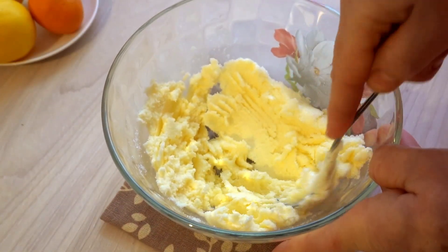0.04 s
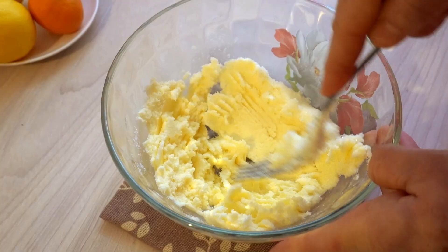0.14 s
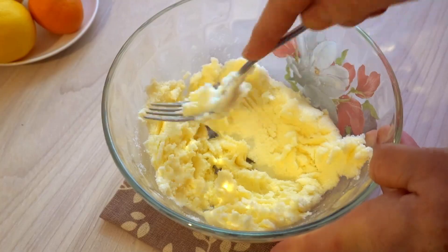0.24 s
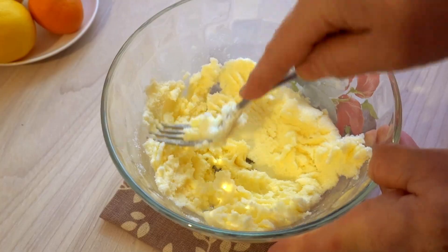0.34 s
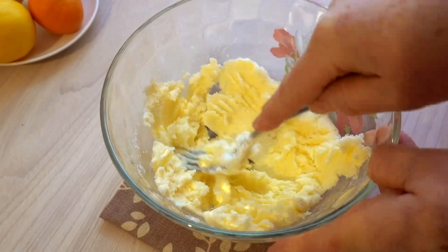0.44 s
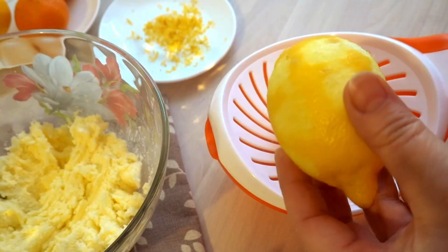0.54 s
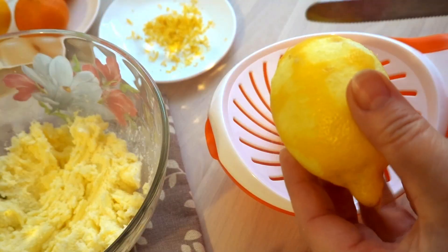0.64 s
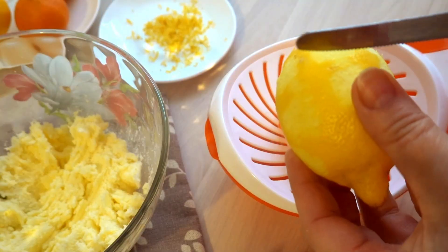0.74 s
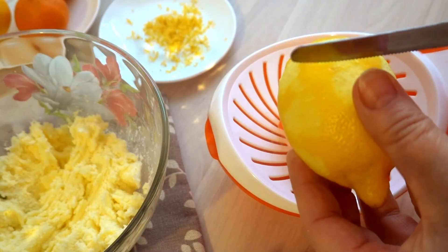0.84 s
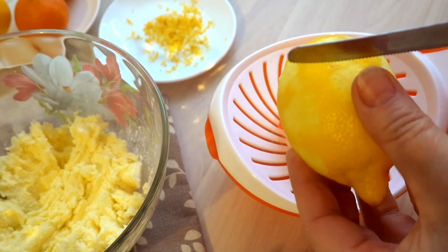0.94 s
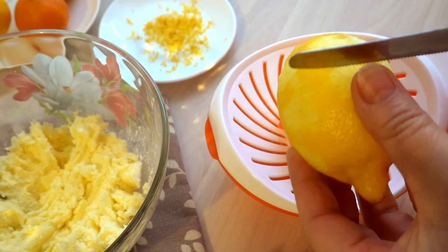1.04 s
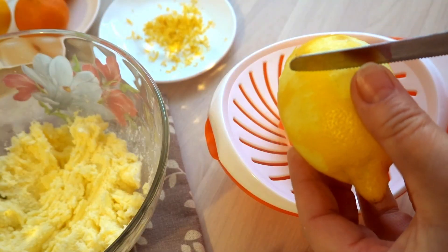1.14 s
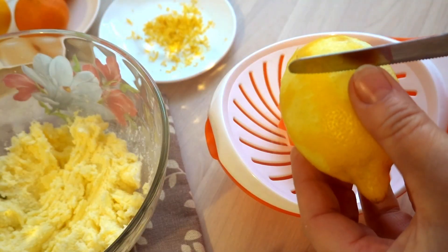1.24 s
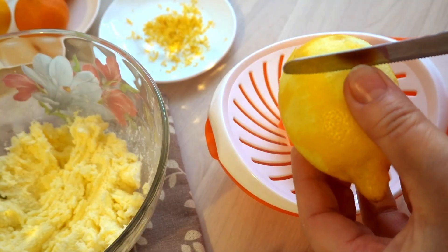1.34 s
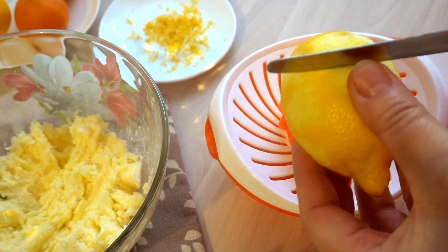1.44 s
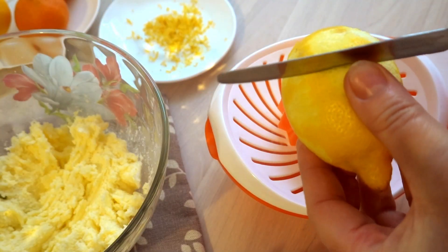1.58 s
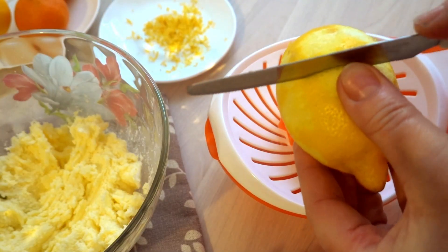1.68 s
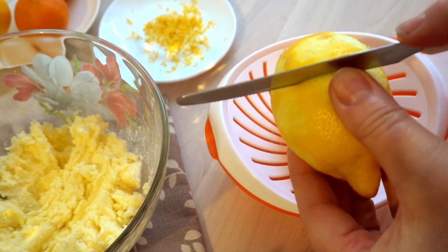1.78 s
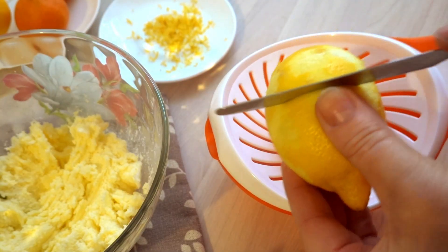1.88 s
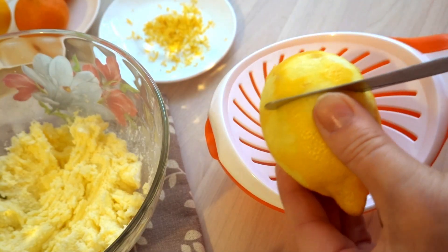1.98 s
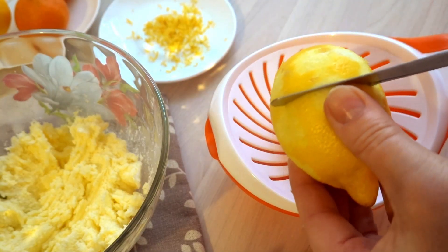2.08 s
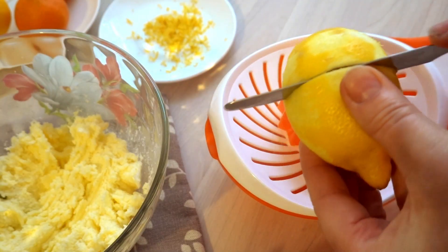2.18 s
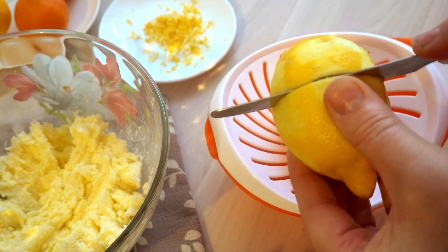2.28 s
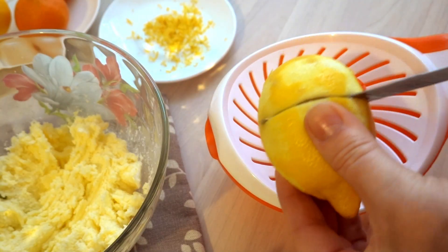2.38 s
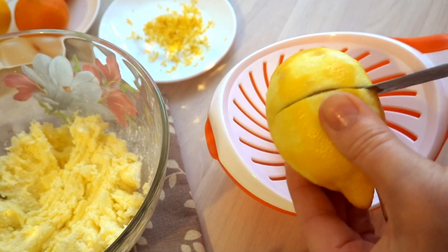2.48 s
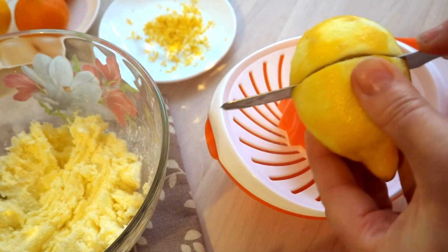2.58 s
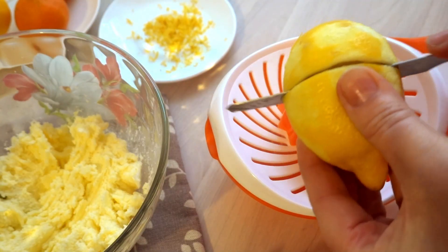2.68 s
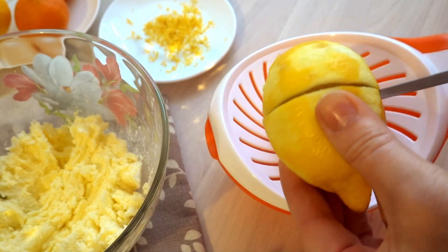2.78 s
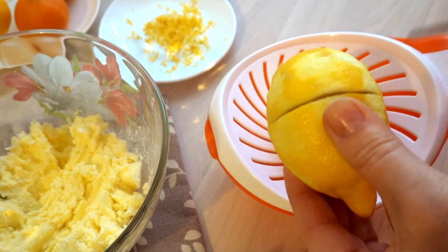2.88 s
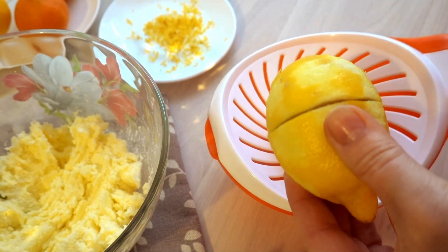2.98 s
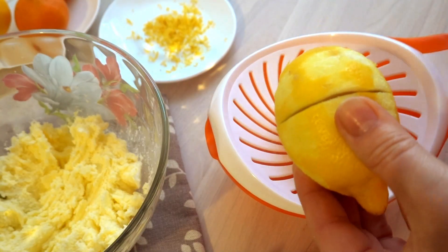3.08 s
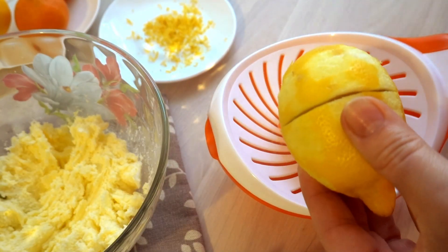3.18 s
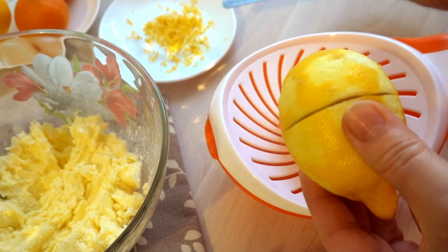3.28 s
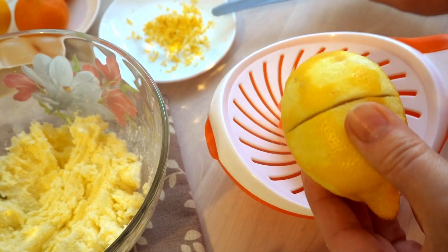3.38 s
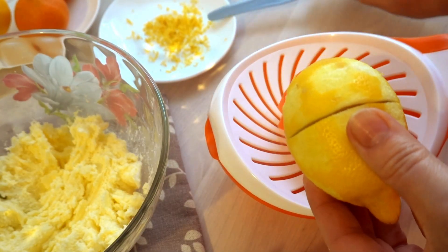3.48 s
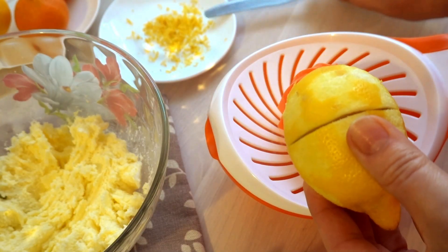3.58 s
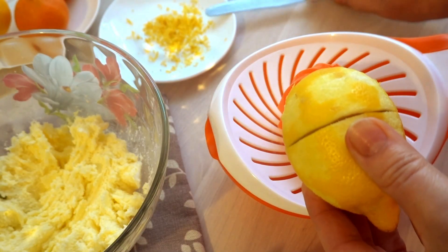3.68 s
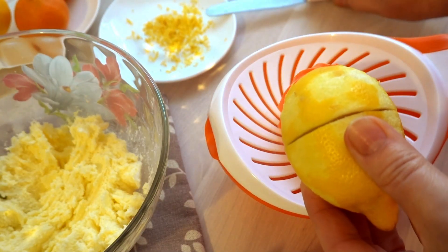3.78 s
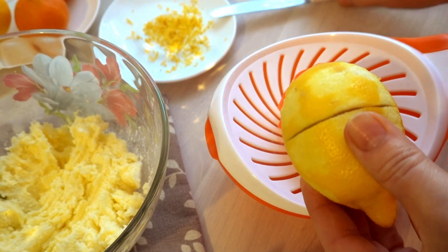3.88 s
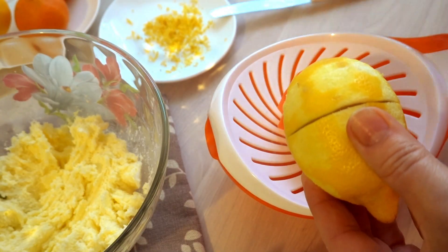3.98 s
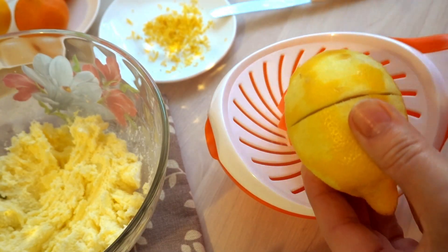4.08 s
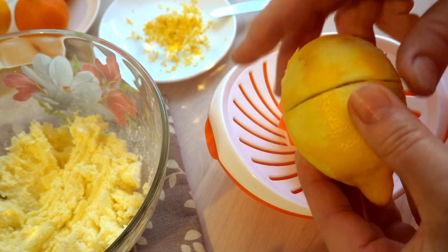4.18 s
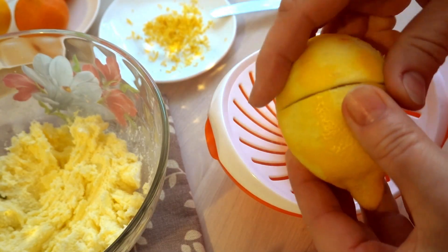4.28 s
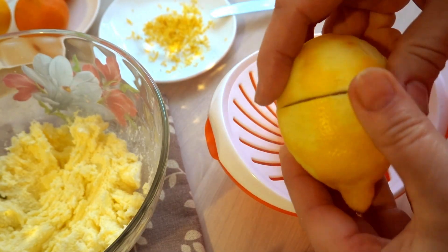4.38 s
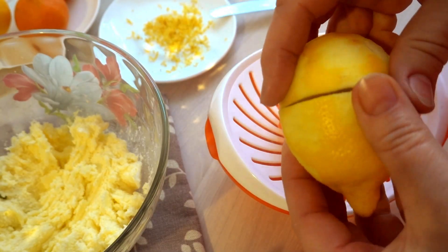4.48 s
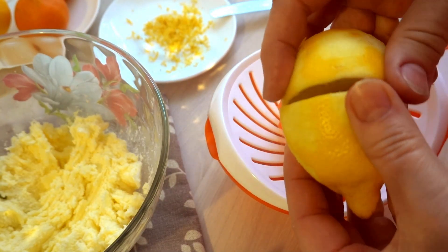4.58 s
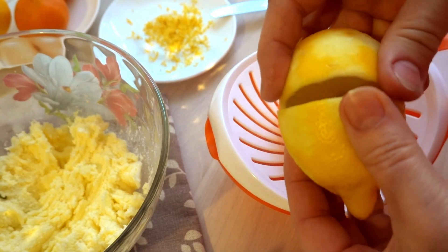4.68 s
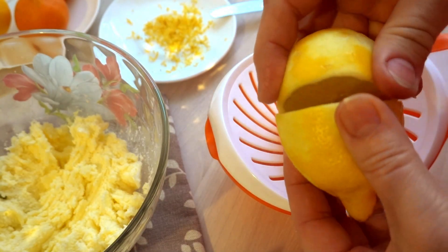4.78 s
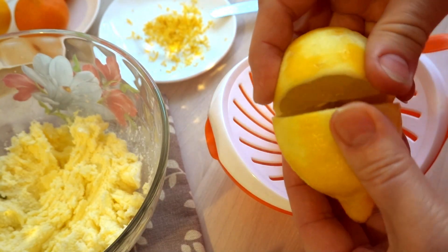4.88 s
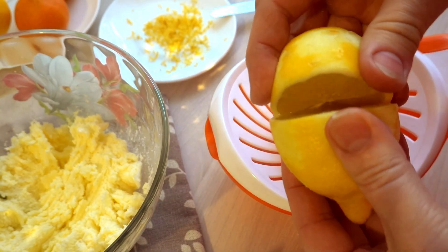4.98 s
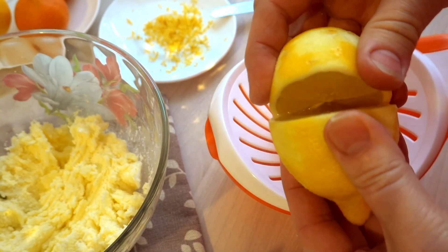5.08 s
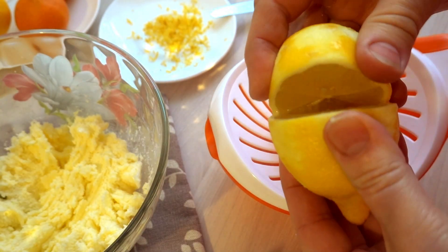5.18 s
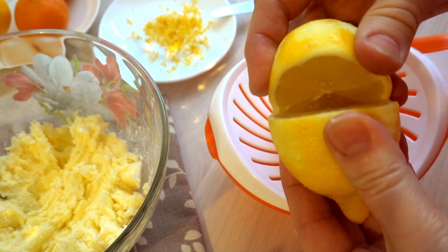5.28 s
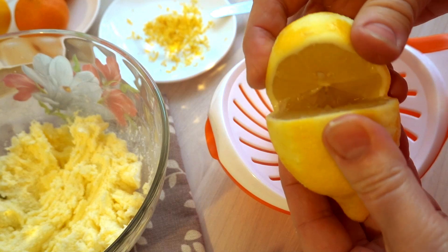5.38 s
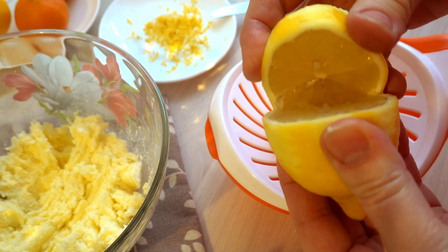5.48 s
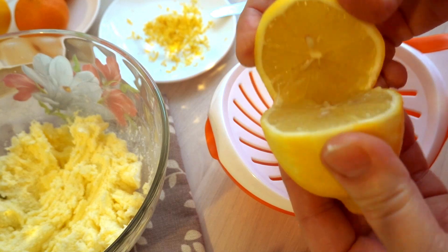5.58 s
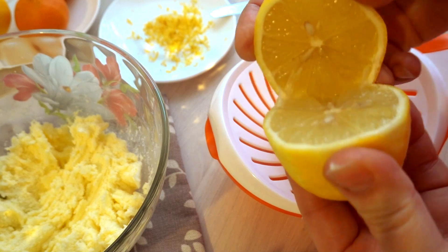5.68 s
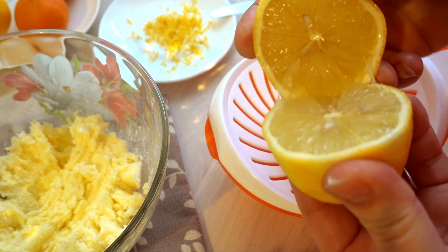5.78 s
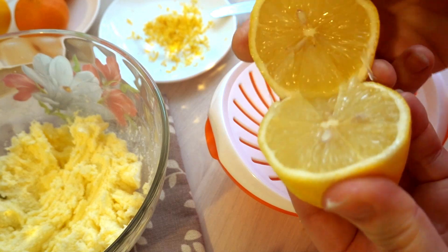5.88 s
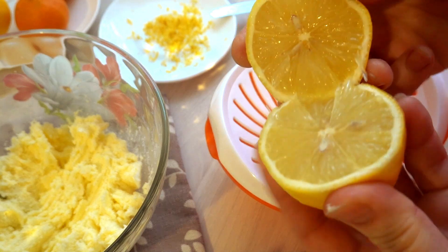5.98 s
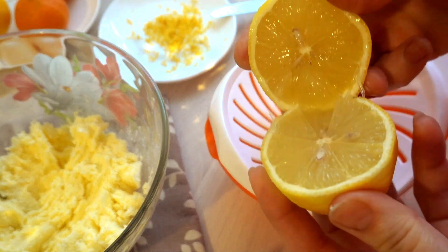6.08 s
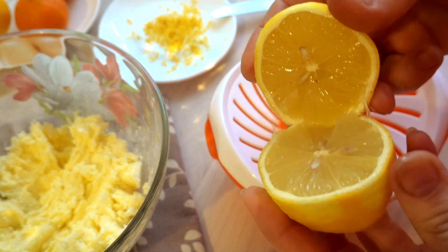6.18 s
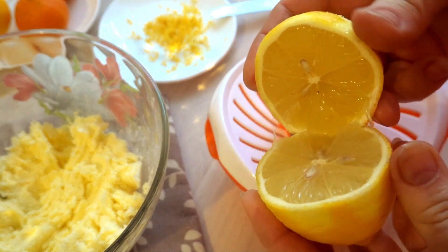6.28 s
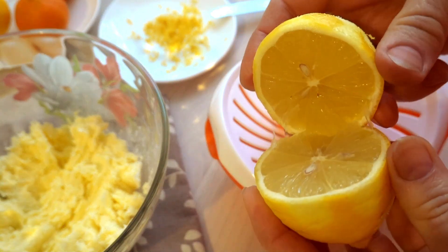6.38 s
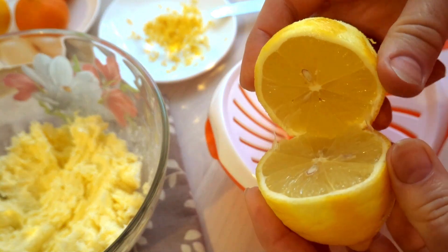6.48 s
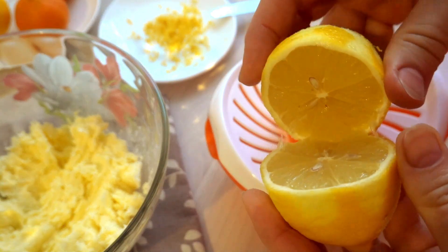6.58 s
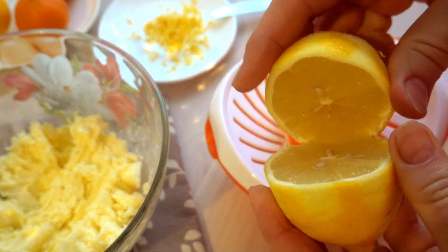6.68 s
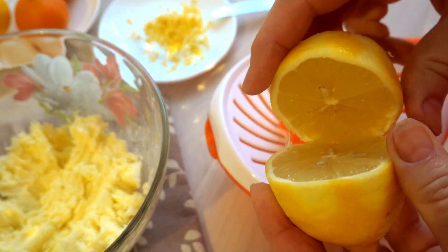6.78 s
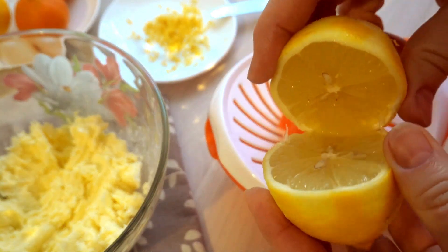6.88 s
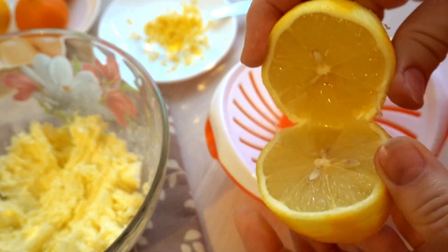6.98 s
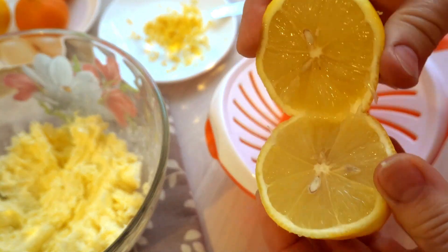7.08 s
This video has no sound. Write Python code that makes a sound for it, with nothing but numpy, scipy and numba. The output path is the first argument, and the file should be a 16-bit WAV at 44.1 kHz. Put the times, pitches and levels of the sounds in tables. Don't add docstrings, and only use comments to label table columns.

```python
import sys
import numpy as np
from scipy import signal
from scipy.fft import rfft, irfft
from scipy.io import wavfile
from scipy.ndimage import uniform_filter1d
from numba import njit

SR = 44100
rng = np.random.default_rng(int(sys.argv[2]) if len(sys.argv) > 2 else 0)


def waveform_to_disk(signal):
    frames = np.transpose(np.atleast_2d(signal))
    scaled = np.clip(frames, -1, 1) * 32767
    samples = np.round(scaled).astype(np.int16)
    wavfile.write(sys.argv[1], SR, samples)


def volts_from_decibels(level):
    exponent = np.asarray(level, float) / 20
    return 10 ** exponent


N = 314874
T = np.arange(N) / SR

# (frequency [Hz], level per Hz [dB])
KITCHEN_COLOUR = [(15, -39), (25, -17.5), (53, -6.5), (90, -3), (177, -3), (296, -5.5), (445, -5),
                  (617, -15.5), (878, 0.5), (979, -8), (1320, -7), (5270, -16), (11600, -16.5),
                  (15200, -13), (16500, -31)]
# (frequency [Hz], likeness [0-1])
KITCHEN_ALIKE = [(60, 0.2), (130, 0.9), (290, 0.6), (640, 0), (1410, 0.03), (3100, 0), (6820, 0),
                 (15000, 0)]
# (on [s], off [s], level [dB])
WHINE_TIMES = [(.58, 1.18, -72.5), (5.084, 6.32, -77), (6.515, 7.1, -75.5)]
# (time [s], level [dB])
RUMBLE_SHAKES = [(.4, -68), (1.57, -63), (1.95, -69.5), (2.19, -65), (2.5, -66), (2.9, -75), (3.2, -81),
                 (3.98, -66.5), (5.07, -68), (6.08, -70)]

# (frequency [Hz], width [Hz], level [dB])
FORK_STROKES = [
    (0.001, 0.048, -56.5, -57, 1),
    (.299, 0.021, -61.5, -60, 3),
    (.34, 0.14, -63.5, -52, 2),
]
FORK_CONTACT = [(0, 3700, -18), (.315, 3300, -28.5), (0.337, 2960, 8.5), (.405, 3480, -5.5),
                (.527, 3100, -20)]
BOWL_BODY = [(736, 76, 11), (316, 240, 0.5), (1560, 630, 1.5)]
# (time [s], rms level [dB], centre [Hz], width [Hz], swell [s])
RUB_PUFFS = [(0.65, -70.5, 2290, 260, .088), (.768, -51.5, 7900, 6400, .0041), (.78, -75, 2351, 460, .027),
             (.972, -66.5, 3250, 490, 0.02), (6.945, -69, 473, 110, 0.0058), (.445, -58, 2940, 410, 0.033),
             (1.366, -59, 4200, 4300, 0.012), (.506, -53, 3130, 440, 0.014), (2.294, -53, 3401, 1500, .004),
             (5.881, -53.5, 7501, 3000, 0.011), (2.32, -48.5, 335, 50, 0.02), (2, -60.5, 690, 120, .012),
             (2.5, -47.5, 381, 34, .0101), (2.7, -44.5, 693, 97, 0.021), (2.78, -54.5, 700, 140, 0.028),
             (2.9, -64, 251, 62, .084), (4.6, -66, 950, 120, 0.019), (4.64, -62.5, 908, 76, .02),
             (4.645, -65, 2600, 620, 0.015), (5.12, -66, 2055, 270, .031), (5.1, -65, 280, 200, 0.07),
             (5.9, -65, 901, 150, 0.029), (6.996, -58, 439, 72, 0.0053), (3.326, -51, 7621, 5200, .013),
             (5.462, -53, 2900, 2700, 0.012), (3.8, -55.5, 151, 90, 0.045), (3.832, -45.5, 373, 128, .012),
             (6.4, -71.5, 450, 150, 0.075), (1.6, -66.5, 253, 74, 0.037), (1.9, -57.5, 390, 230, 0.029),
             (0.0012, -66.5, 260, 110, 0.029)]
# (time [s], peak level [dB], frequency [Hz])
LOUD_SLIPS = [(.03, -44, 10000), (.3325, -38.5, 5900), (.4, -40, 3320), (.482, -42, 3360),
              (1.392, -43, 4210), (1.486, -34.5, 5160), (1.612, -24.5, 5200), (1.652, -34.5, 5040),
              (1.8305, -27.5, 3960), (1.89, -20, 3380), (1.932, -27.5, 3300), (1.938, -22, 3180),
              (2.14, -17, 3470), (2.187, -34, 4200), (2.298, -35, 3400), (2.309, -27, 3280),
              (1.3745, -46, 2900), (1.395, -31, 4620), (1.518, -33, 3240), (1.556, -29.5, 3670),
              (1.599, -35, 3600), (1.685, -36, 4050), (1.8325, -31.5, 4500), (1.908, -27, 3200),
              (1.966, -37, 4000), (2.076, -37, 6000), (2.13, -29.5, 3700), (2.329, -27, 3900),
              (2.467, -37, 4360), (2.513, -19.5, 3600), (2.527, -23, 3600), (2.543, -26, 3600),
              (2.548, -26, 4000), (2.72, -26, 4300), (2.76, -33.5, 4900), (.524, -42, 3100)]
# (time [s], level [dB])
SCENE_CHANGE = [
    (.536, 3.5),
    (.552, -9),
    (.56, -86),
    (.569, -14),
    (.586, -2),
]
HAND_STROKES = [(.585, 0.068, -73.5, -73, -8), (.74, 0.03, -111, -65.5, 5), (.93, 0.069, -81, -97, -5.5),
                (2.82, 0.089, -68, -69.5, 0), (2.95, 0.032, -83, -77.5, -6), (3.02, 0.19, -78.5, -65.5, -2),
                (3.328, 0.0068, -69, -63, 2)]
HAND_CONTACT = [(.58, 2300, 16.3), (.8, 2890, 7.8), (1.0, 3306, 1.8), (2.85, 3561, 16.4), (2.96, 2380, 9.2),
                (3.25, 2270, 11.7), (3.341, 2660, 7.3)]
PALM_BODY = [(250.1, 50, -4), (490.8, 484, 3), (1235, 850, 3)]
SAW_STROKES = [(1.389, 0.036, -48, -46, -2), (1.46, .14, -55, -42.5, -4), (1.65, 0.046, -55, -51.5, -7),
               (1.829, 0.072, -44.5, -34, -17), (2.04, .026, -51.5, -55.5, 3.5),
               (2.085, 0.037, -41.5, -33, -15.5), (2.303, 0.04, -42, -39.5, -18),
               (2.464, 0.057, -44.5, -32, -14.5), (2.668, 0.084, -46, -41, -10.5)]
SAW_CONTACT = [(1.38, 3670, -11), (1.75, 3430, -3.5), (1.88, 3175, -12.5), (2.1, 3590, -7),
               (2.35, 3650, -0.5), (2.55, 3400, -5), (2.7, 4040, 2.5), (2.8, 4700, 0)]
SAW_LIFT_TIMES = [1.455, 1.628, 1.718, 1.97, 2.08, 2.2, 2.4, 2.584, 2.806]
JUICER_BODY = [(337, 240, -4.5), (710, 380, -7), (1290, 3000, 16.5)]

# (time [s], ring level [dB], rattle level [dB], table thud level [dB])
TIP_BLOWS = [
    (3.4435, -5.5, -36.5, -24),
]
# (time [s], ring level [dB], rattle level [dB], table thud level [dB])
BLADE_BLOWS = [
    (3.7935, -6, -24, -31),
    (3.8105, -8, -27.5, -27.5),
    (3.842, -19.5, -25.5, -27.5),
    (3.862, -19.5, -30.5, -36),
]
STEEL_NOTES = [3078, 3700, 4015, 4400, 4720, 4880, 4985, 5260, 5550, 6190, 6956, 9300, 10450, 11300, 12030,
               12850, 13700, 15050]
# (bunch width [Hz], tip level [dB], blade level [dB], bounce level [dB])
STEEL_LEVELS = [(21, -21.5, -15, -0.5), (250, -19, -9, -13.5), (92, -13.5, 2.5, -1.5),
                (201, -21, -14.5, -16.5), (71, -10, -1, -5), (71, 2, 8, 8), (51, 2, 2.5, 0.5),
                (81, -14, -7, -9), (201, -13.5, -8.5, -12), (71, -22, -2, 5), (51, -4.5, 1.5, -2.5),
                (110.1, 0, 3, 1.5), (301, -17, -22.5, -22), (398, -20, -19, -19), (91, -18, -3, -3.5),
                (151, -18, -10, -10.5), (151, -21, -9.5, -9), (111, -11.5, -3.5, -3)]
# (after the tip [s], with the blade lying flat [s])
STEEL_DECAY = [(.3, 0.37), (.1, .15), (0.15, 0.3), (.1, .13), (.15, .15), (.1, .12), (.19, .17), (.22, .2),
               (0.17, .2), (.12, 0.38), (.08, .14), (0.059, .08), (.047, .047), (.08, .08), (.12, .12),
               (.1, .1), (.12, .12), (.14, .14)]
# (frequency [Hz], bunch width [Hz], fall by 60 dB [s], level [dB])
TIP_TABLE_MODES = [(250, 40, .1, -2), (305.5, 36, 0.12, 1), (376, 35, .07, -4), (525, 50, .12, 0.5),
                   (750, 80, 0.081, -6), (1000, 110, 0.047, -10), (1500, 450, .06, -12.5)]
# (frequency [Hz], bunch width [Hz], fall by 60 dB [s], level [dB])
BLADE_TABLE_MODES = [(253, 58, 0.3, -5.5), (295, 130, 0.05, -9.5), (365, 29, 0.26, 0), (574, 39, 0.15, -6),
                     (753, 73, 0.069, -9.5), (1390, 320, 0.11, -14)]
# (frequency [Hz], level per Hz [dB])
RATTLE_COLOUR = [(240, -27.5), (400, -7.5), (1200, -13), (3120, -12), (3370, -12.5), (4880, -4),
                 (8500, -17.5), (15300, -23), (16000, -50.5)]

PULP_STROKES = [(4.3, 0.015, -66, -68.5, -7), (4.638, 0.043, -58.5, -66, 0.5),
                (4.965, 0.22, -69.5, -79, -10.5), (5.25, 0.17, -65, -64, -4),
                (5.462, 0.14, -55.5, -65, 3.5), (5.59, 0.11, -68, -65, 2.5), (5.74, 0.088, -68, -61, 0.5),
                (5.878, 0.03, -55.5, -65, 4.5), (5.92, 0.027, -60, -66, -12), (6.03, 0.16, -78, -75.5, -10),
                (6.25, 0.28, -81, -77.5, -4.5), (7.005, .1, -68.5, -71.5, 2.5)]
PULP_CONTACT = [(4.1, 3200, 10.5), (4.3, 4060, 4), (4.64, 4730, 0.5), (5.0, 4173, 2.5), (5.12, 2080, 4),
                (5.3, 3270, -7), (5.87, 3430, -8), (6.1, 2913, 5), (6.759, 3414, 1)]
# (time [s], peak level [dB], frequency [Hz])
FIBRE_SNAPS = [(4.32, -45, 6000), (4.87, -51, 9000), (5.239, -47, 3900), (5.25, -29, 10000),
               (5.314, -44, 4000), (5.463, -39, 4000), (5.471, -36, 3000), (5.476, -25, 4000),
               (5.482, -27, 9000), (5.488, -33, 4000), (5.504, -19, 9000), (5.514, -39, 9000),
               (5.531, -30, 10000), (5.535, -30, 4500), (5.5406, -22, 7000), (5.556, -33, 3000),
               (5.569, -40, 3400), (5.606, -25, 3000), (5.608, -38, 4000), (5.6605, -39, 6000),
               (5.662, -36, 7000), (5.6635, -39, 5000), (5.675, -41, 4000), (5.682, -15.5, 11000),
               (5.691, -35, 11000), (5.733, -24, 8000), (5.785, -32, 6000), (5.825, -43, 4000),
               (5.852, -36, 12000), (5.853, -28, 12000), (5.8545, -36, 9000), (5.875, -44, 6000),
               (5.926, -43, 4000), (5.93, -44, 5000), (6.28, -50, 4500), (7.003, -32, 10000),
               (7.0995, -38, 4200), (7.123, -46, 6000)]
# (frequency [Hz], fall by 60 dB [s])
ROOM_DECAY = [(150, 0.74), (600, 0.56), (2500, 0.4), (7000, 0.26), (13000, 0.18)]

HANDS_LAG = 0.8
FORK_PAN_DB, HANDS_PAN_DB, SAUCER_PAN_DB = -0.5, -3, 0.3
BOTH_SIDES = np.array([[1], [-1]])


def unit(x):
    return x / np.sqrt(np.mean(x ** 2) + 1e-30)


def along(table, hz):
    f, v = np.transpose(table)
    return np.interp(np.log(hz + 1), np.log(f), v)


def colour(x, spectrum):
    gain = volts_from_decibels(along(spectrum, np.fft.rfftfreq(len(x), 1 / SR)))
    return irfft(rfft(x) * gain, len(x))


@njit
def moving_band(x, hz, sharp):
    y, b, l, k = np.empty(len(x)), 0., 0., 1 / sharp
    for i in range(len(x)):
        g = np.tan(np.pi * hz[i] / SR)
        v = (b + g * (x[i] - l)) / (1 + g * (g + k))
        b = 2 * v - b
        l = l + 2 * g * v
        y[i] = k * v
    return y


def band(x, hz, width_hz):
    return moving_band(x, np.full(len(x), 1. * hz), hz / width_hz)


def kitchen():
    alike = np.clip(along(KITCHEN_ALIKE, np.fft.rfftfreq(N, 1 / SR)), 0, 1)
    mid = colour(rng.standard_normal(N), KITCHEN_COLOUR)
    side = colour(rng.standard_normal(N), KITCHEN_COLOUR)
    mid = irfft(rfft(mid) * np.sqrt(1 + alike), N)
    side = irfft(rfft(side) * np.sqrt(1 - alike), N)
    hum = volts_from_decibels(-64.5) * np.array([mid + side, mid - side]) / np.std(mid)

    switch = sum(volts_from_decibels(db) * (T > on) * (T < off) for on, off, db in WHINE_TIMES)
    whine = unit(band(rng.standard_normal(N), 11380, 51))
    return hum + whine * uniform_filter1d(switch, size=SR // 50)


def rumble():
    rest_db, slope_db_s = -82, 95.5
    shake = volts_from_decibels(rest_db) + sum(volts_from_decibels(db - slope_db_s * np.abs(T - s)) for s, db in RUMBLE_SHAKES)
    return unit(band(band(rng.standard_normal(N), 70, 110), 70, 110)) * shake


def grit(rate, spread_db):
    chance = rng.random((3, N))
    steps = np.repeat(rng.standard_normal(N // 200 + 1), 200)
    bunch = uniform_filter1d(steps, 200)[:N]
    size = volts_from_decibels(-spread_db * np.log(chance[1] + 0.033) + spread_db * np.tanh(bunch))
    return unit((chance[0] < rate / SR) * size * np.sign(chance[2] - .5))


def pressure(strokes, fall_db_s, ease_s, share):
    bite_s, bite_from_db = 0.0077, -24
    s, swell, bite_db, peak_db = np.transpose(strokes)[:4, :, None]
    after = np.maximum(T - s - swell, 0)
    rise = (bite_db - peak_db) * np.clip(1 - (T - s) / swell, 0, 1)
    db = rise - fall_db_s * after ** 2 / (after + ease_s)
    return volts_from_decibels(peak_db + share * db + bite_from_db * np.clip((s - T) / bite_s, 0, 5))


def rub(strokes, contact, body, fall_db_s, ease_s, rate, spread_db, sharp, skirt, lift=0):
    s, hz, body_db = np.transpose(contact)
    slips = grit(rate, spread_db)
    centre = np.interp(T, s, np.clip(hz, 500, 9000))
    scrape = unit(moving_band(moving_band(slips, centre, sharp), centre, sharp))
    scrape = unit(scrape + skirt * unit(band(band(slips, 3900, 5200), 3000, 9200)))
    hollow = unit(sum(volts_from_decibels(db) * unit(band(slips, f, w)) for f, w, db in body))
    hollow = hollow * volts_from_decibels(np.interp(T, s, body_db))
    fine = unit(band(band(slips, 9920, 14200), 6100, 11000))

    force = pressure(strokes, fall_db_s, ease_s, 1) * volts_from_decibels(lift)
    body_force = pressure(strokes, fall_db_s, ease_s, 0.66) * volts_from_decibels(lift)
    fine_gain = volts_from_decibels(np.transpose(strokes)[4]) @ force
    return scrape * force.sum(axis=0) + hollow * body_force.sum(axis=0) + fine * fine_gain


def fork_mashing():
    return rub(FORK_STROKES, FORK_CONTACT, BOWL_BODY, fall_db_s=265, ease_s=0.011,
               rate=12000, spread_db=2.7, sharp=0.72, skirt=2.3)


def puffs():
    out, t = np.zeros(N + SR // 2), np.arange(SR // 2) / SR
    for s, db, hz, width_hz, swell_s in RUB_PUFFS:
        hiss = unit(band(band(rng.standard_normal(len(t)), hz, width_hz), hz, width_hz))
        swell = t / swell_s * np.exp(1 - t / swell_s)
        out[int(s * SR):int(s * SR) + len(t)] += volts_from_decibels(db) * hiss * swell
    return out[:N]


def ticks(events, sharp, length_s, tail, creak_s):
    out, t = np.zeros(N), np.arange(500) / SR - round(creak_s * SR) / SR
    for s, db, hz in events:
        crackle = np.exp(-np.where(t < 0, -3 * t, t) / length_s)
        burst = band((t == 0) + tail * rng.standard_normal(len(t)) * crackle, hz, hz / sharp)
        i = int(s * SR)
        out[i:i + len(t)] += (volts_from_decibels(db) * burst / np.abs(burst).max())[:N - i]
    return out


def loud_slips():
    return ticks(LOUD_SLIPS, sharp=2.6, length_s=0.0014, tail=0.59, creak_s=0.0002)


def hands_rubbing():
    return rub(HAND_STROKES, HAND_CONTACT, PALM_BODY, fall_db_s=120.0, ease_s=0.012,
               rate=10000, spread_db=1.6, sharp=0.89, skirt=0.66)


def knife_sawing():
    lift_db, lift_s = -9, 0.0077
    lift = lift_db * np.clip((T - np.array(SAW_LIFT_TIMES)[:, None]) / lift_s, 0, 1)
    return rub(SAW_STROKES, SAW_CONTACT, JUICER_BODY, fall_db_s=510, ease_s=0.092,
               rate=8000, spread_db=2.3, sharp=1.23, skirt=0.4, lift=lift)


def ring(modes, t):
    y = 0
    for hz, width_hz, t60, db in modes:
        shift, phase = rng.random((2, 6, 1))
        shift = (np.arange(6)[:, None] + shift) / 3 - 1
        bunch = np.exp(2j * np.pi * (width_hz * shift * t + 0.68 * phase)).sum(axis=0)
        bunch = bunch * np.exp(-t / 0.11)
        z = volts_from_decibels(db) * (1 + 0.5 * bunch) * np.exp((2j * np.pi * hz - np.log(1000) / t60) * t)
        skew = min(hz / 7500, 1) * rng.uniform(.5, 1) * rng.choice([1, -1])
        y = y + np.imag(z * np.exp(1j * skew * BOTH_SIDES))
    return y / np.abs(y).max()


def clink(blows, rings, table, rattle_s, choke_db):
    out, t = np.zeros((2, N)), np.arange(SR // 3) / SR
    next_touch = [blow[0] for blow in blows[1:]] + [np.inf]
    for (s, ring_db, rattle_db, thud_db), modes, until in zip(blows, rings, next_touch):
        rattle = unit(colour(rng.standard_normal(len(t)), RATTLE_COLOUR)) * np.exp(-t / rattle_s)
        choke = volts_from_decibels(choke_db * np.clip(1 + (s + t - until) / 0.0049, 0, 1))
        bright = volts_from_decibels(ring_db) * ring(modes, t) + volts_from_decibels(rattle_db) * rattle
        bright = bright * choke * (1 - np.exp(-t / 0.00014))
        thud = volts_from_decibels(thud_db) * ring(table, t) * (1 - np.exp(-t / 0.0015))
        out[:, int(s * SR):int(s * SR) + len(t)] += bright + thud
    return out


def no_bass(x, hz):
    return signal.sosfilt(signal.butter(2, hz, "high", fs=SR, output="sos"), x)


def knife_on_saucer():
    width, tip_db, blade_db, bounce_db = np.transpose(STEEL_LEVELS)
    tip_s, flat_s = np.transpose(STEEL_DECAY)
    tip = np.column_stack([STEEL_NOTES, width, tip_s, tip_db])
    blade = np.column_stack([STEEL_NOTES, width, flat_s, blade_db])
    bounce = np.column_stack([STEEL_NOTES, width, flat_s, bounce_db])
    clinks = clink(TIP_BLOWS, [tip], TIP_TABLE_MODES, rattle_s=0.026, choke_db=0)
    clinks = clinks + clink(BLADE_BLOWS, [blade, bounce, bounce, bounce], BLADE_TABLE_MODES,
                            rattle_s=0.035, choke_db=-11)
    return no_bass(clinks, 190)


def pulp_parting():
    return rub(PULP_STROKES, PULP_CONTACT, PALM_BODY, fall_db_s=157.0, ease_s=0.0075,
               rate=13000, spread_db=4.2, sharp=0.6, skirt=0.19)


def fibres_snapping():
    return no_bass(ticks(FIBRE_SNAPS, sharp=0.42, length_s=0.0007, tail=0.2, creak_s=0.0012), 1500)


def stereo(x, lag, pan_db):
    late = irfft(rfft(x) * np.exp(-2j * np.pi * np.fft.rfftfreq(N) * lag), N)
    return np.array([late * volts_from_decibels(pan_db / 2), x * volts_from_decibels(-pan_db / 2)])


def room(x):
    t, tails = np.arange(SR // 2) / SR, 0
    for hz, t60 in ROOM_DECAY:
        mid = band(rng.standard_normal(len(t)), hz, 0.95 * hz)
        side = band(rng.standard_normal(len(t)), hz, 0.95 * hz)
        both = mid + min(hz / 1800, 1) * side * BOTH_SIDES
        tails = tails + both * np.exp(-np.log(1000) * t / t60)
    tails = tails * (1 - np.exp(-t / 0.00067))
    return signal.fftconvolve(x[None], tails / np.sqrt(np.sum(tails ** 2) / 2), axes=1)[:, :N]


def scene():
    fork = fork_mashing()
    rubs = knife_sawing() + hands_rubbing() + pulp_parting() + loud_slips() + puffs()
    snaps = fibres_snapping()
    clinks = knife_on_saucer()

    near = stereo(fork, HANDS_LAG, FORK_PAN_DB) + stereo(rubs, HANDS_LAG, HANDS_PAN_DB)
    near = near + stereo(snaps, HANDS_LAG / 2, HANDS_PAN_DB)
    near = near + clinks * volts_from_decibels(0.5 * BOTH_SIDES * SAUCER_PAN_DB)

    to_room = fork + volts_from_decibels(-2) * rubs + volts_from_decibels(0.5) * clinks.mean(axis=0) + volts_from_decibels(-8) * snaps
    mix = volts_from_decibels(0.66) * near + volts_from_decibels(-4.5) * room(to_room) + kitchen() + rumble()
    return mix * volts_from_decibels(np.interp(T, *np.transpose(SCENE_CHANGE)))


def roll_off(x):
    return signal.sosfilt(signal.butter(12, 16960, fs=SR, output="sos"), x)


def record(dry):
    no_top = signal.sosfilt(signal.ellip(6, .3, 40, 16300, fs=SR, output="sos"), dry)
    mix = signal.sosfilt(signal.butter(1, 30, "high", fs=SR, output="sos"), no_top)
    return roll_off(mix)


dry = scene()
out = record(dry)
waveform_to_disk(out)
```